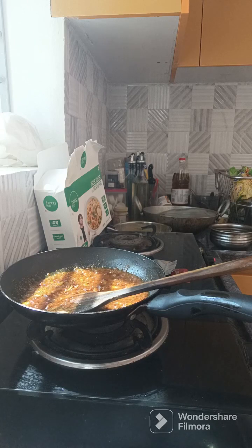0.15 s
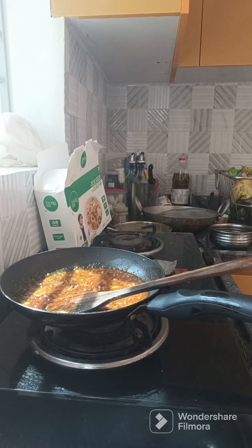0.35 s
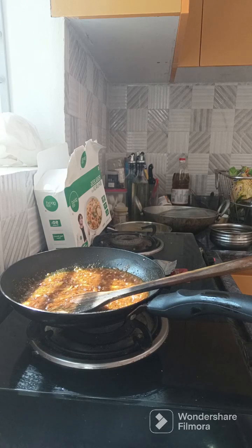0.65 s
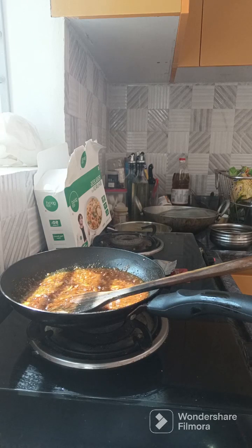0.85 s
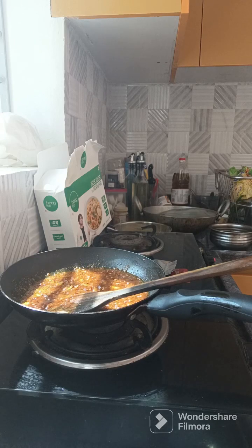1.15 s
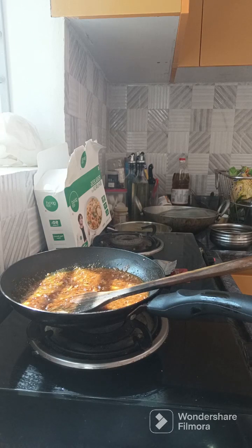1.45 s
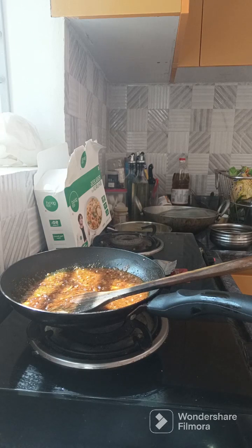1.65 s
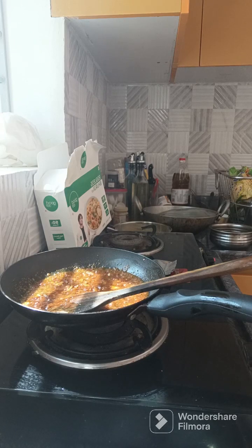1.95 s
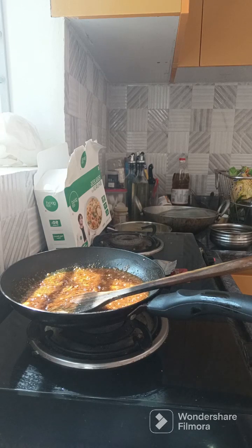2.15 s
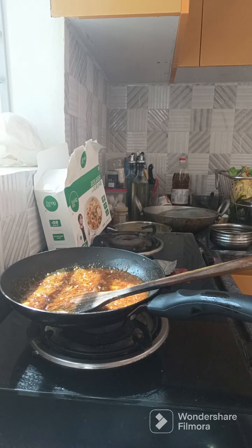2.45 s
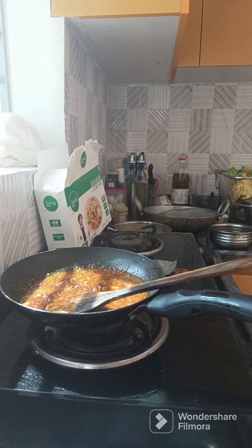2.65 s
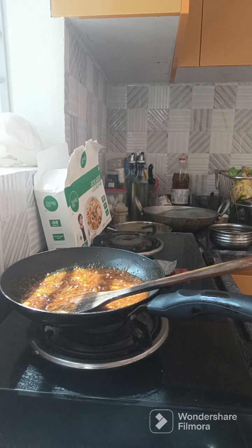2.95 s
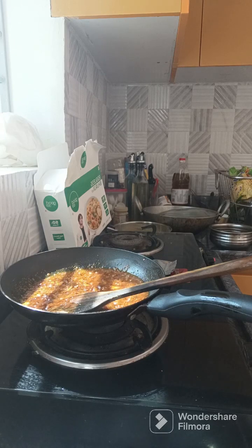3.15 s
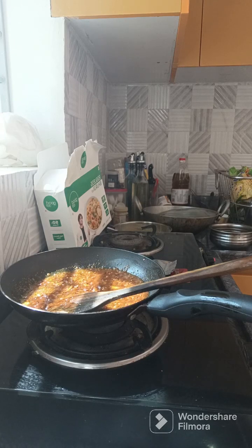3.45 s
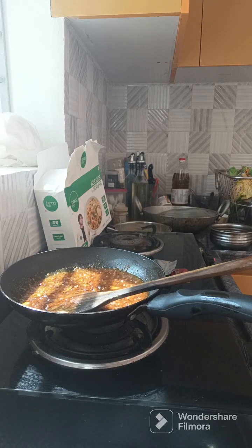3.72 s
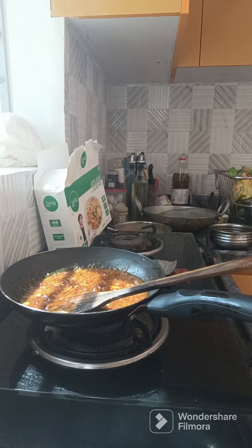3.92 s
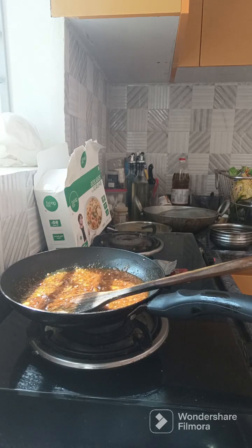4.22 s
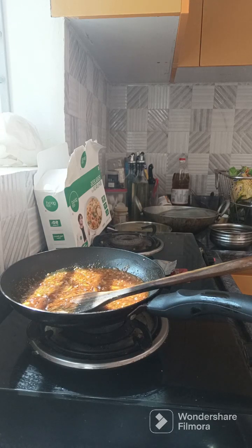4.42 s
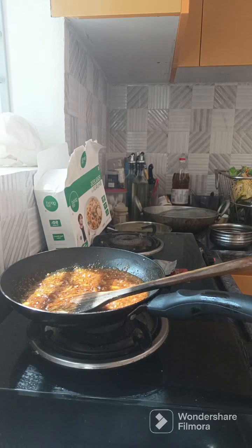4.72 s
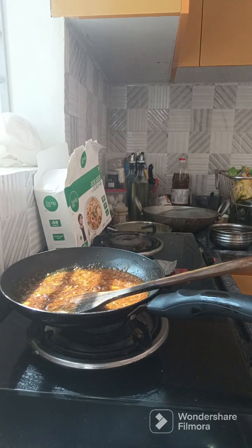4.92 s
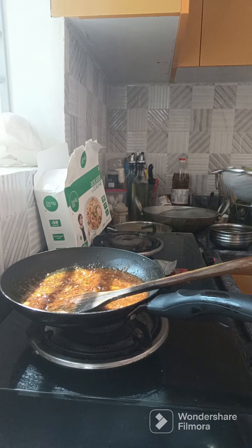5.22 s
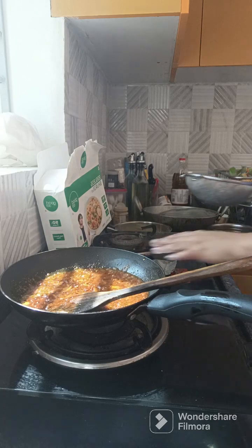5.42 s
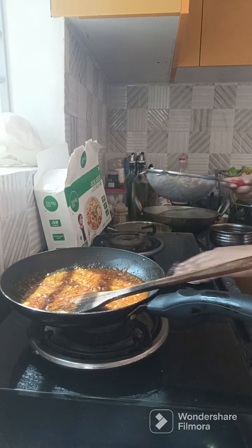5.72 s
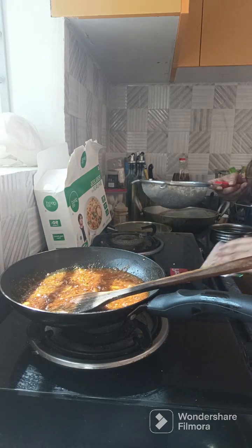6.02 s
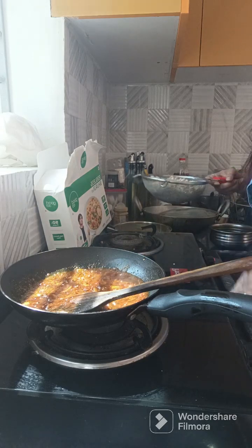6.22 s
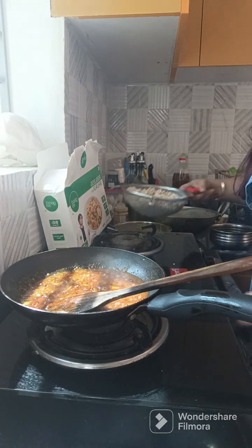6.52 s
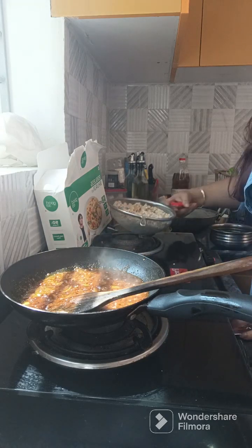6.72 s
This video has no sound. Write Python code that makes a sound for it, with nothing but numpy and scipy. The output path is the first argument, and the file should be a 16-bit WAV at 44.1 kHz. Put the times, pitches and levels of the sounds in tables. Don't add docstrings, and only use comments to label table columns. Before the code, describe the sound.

Onions and liquid simmer throughout in a frying pan close to a phone's stereo microphone: dense, grainy bubbling centred in the upper mids, frequent short rising pops, and an airy steam hiss that thins slightly. The background drone is barely present, and the small tiled kitchen gives short reflections. A very soft touch hums at 0.3 s. At 1.1 s a pot lands with a dull thud and metallic ring, rocking again at 1.3 s. From 1.9 to 2.9 s seven light, bright sieve taps come about every sixth of a second, the sixth hardest. At 3.4 s a faint high graze precedes a louder metal clash and quick mesh rattle at 3.6 s, ringing briefly. At 5.35 s a spoon cracks drily against the rim; fat spits vigorously until about 6.4 s, with the sharpest snap near 5.8 s. From 6.5 s soft, low bumps and knocks sound on the counter while simmering continues.

```python
import sys
import numpy as np
from scipy import signal
from scipy.fft import rfft, irfft, next_fast_len
from scipy.io import wavfile
from scipy.ndimage import uniform_filter1d, map_coordinates

SR = 44100
rng = np.random.default_rng(int(sys.argv[2]) if len(sys.argv) > 2 else 0)


def gain_from_db(level_db):
    decades = np.asarray(level_db, float) / 20
    return 10 ** decades


def dump_mix(stems):
    frames = np.atleast_2d(stems).T
    limited = np.clip(frames, -1, 1)
    pcm = np.round(limited * 32767).astype(np.int16)
    wavfile.write(sys.argv[1], SR, pcm)


N = 302967


def unit(x):
    return x / np.sqrt(np.mean(x ** 2) + 1e-20)


def along(points, hz):
    f, v = np.transpose(points)
    return np.interp(np.log(hz + 1), np.log(f + 1), v)


def wobble(rate):
    knots = rng.standard_normal(int(N * rate / SR) + 4)
    return map_coordinates(knots, [np.arange(N) * rate / SR])


def filtered(x, response):
    n = x.shape[-1]
    m = 2 * next_fast_len(n // 2 + SR // 10, True)
    return irfft(rfft(x, m) * response(np.fft.rfftfreq(m, 1 / SR)), m)[..., :n]


def colour(spectrum):
    def response(hz):
        gain = gain_from_db(along(spectrum, hz))
        cepstrum = irfft(np.log(gain / np.sqrt(np.mean(gain ** 2)) + 1e-6))
        cepstrum[1:len(hz) - 1] *= 2
        cepstrum[len(hz):] = 0
        return np.exp(rfft(cepstrum))
    return response


def patchy(depth_db, channels=2):
    z = signal.stft(rng.standard_normal((channels, N)), nperseg=256)[2]
    field = uniform_filter1d(rng.standard_normal(z.shape[1:]), size=2, axis=0)
    field = uniform_filter1d(field, size=7, axis=1)
    return unit(signal.istft(z * gain_from_db(depth_db * unit(field)), nperseg=256)[1][:, :N])


def leaned(x, points):
    return filtered(x, lambda hz: gain_from_db(.5 * np.outer([1, -1], along(points, hz))))


# f/Hz, lead/rad
PORT_LEAD = [(0, 2), (600, 1.5), (1030, 3), (1380, 1.16), (1640, 1), (2410, 1), (3190, 0.78), (3530, 1.02),
             (4910, 1), (5430, -6), (7240, -4.5), (8870, -1), (10500, -2.5), (16500, -10.5)]
# f/Hz, level/dB
PORT_LEAN = [(60, -8), (110, 1), (200, -6), (380, 14.5), (700, -1), (1290, 0), (2380, 1), (4400, -1.5),
             (8120, -4), (15000, 17.5)]


def ports(near, far, far_share):
    share = np.clip(far_share, 0, 1)
    lead = lambda hz: np.exp(.5j * np.outer([1, -1], along(PORT_LEAD, hz)))
    both = np.sqrt(1 - share) * filtered(near, lead) + np.sqrt(share) * far
    return leaned(both, PORT_LEAN)


def tiles(x, t60):
    t = np.arange(SR // 5) / SR
    echo = rng.standard_normal((2, len(t))) * gain_from_db(-60 * t / t60) * (t > .004)
    return signal.fftconvolve(x[None], echo / np.linalg.norm(echo[0]), axes=1)[:, :N]


def strikes(rows, spectrum, crack_s, tail_db, tail_s, gain_db, modes=(), ring_db=0, rise_s=0.00067,
            rough=.1, dull_hz=9000, size=SR // 2):
    first, last = (round(s * SR) - 10 for s in (rows[0][0], rows[-1][0]))
    out = np.zeros((2, N + SR))
    cracks, tails, ring = np.zeros((3, 2, last - first + size))
    t = np.arange(size) / SR
    for s, db, pan_db in rows:
        side = gain_from_db(db + gain_db + np.array([[pan_db], [-pan_db]]) / 2) * (1 - np.exp(-t / rise_s))
        start = round(s * SR) - 10 - first
        at = slice(start, start + size)
        cracks[:, at] += side * gain_from_db(-60 * t / crack_s) * rng.standard_normal((2, size))
        tails[:, at] += side * gain_from_db(tail_db - 60 * t / tail_s) * rng.standard_normal((2, size))
        for hz, level_db, t60 in modes:
            phase = 7 * rng.random() + np.array([[.7], [-.7]])
            blur = rough * np.cumsum(rng.standard_normal((2, size)), 1)
            decay = gain_from_db(ring_db + level_db + rng.normal(0, 1) - 60 * t / t60)
            ring[:, at] += side * decay * np.sin(2 * np.pi * hz * t + phase + blur)
    noise = cracks + filtered(tails, lambda hz: 1 / (1 + 1j * hz / dull_hz))
    out[:, first:last + size] = filtered(noise, colour(spectrum)) + ring
    return out[:, :N]


# f/Hz, level/dB per Hz
DRONE_SPECTRUM = [(12, -21), (20, -12.5), (169, -20.5), (228, -16.5), (320, -24), (403, -18), (898, -21),
                  (1240, -15.5), (1400, -11), (1820, -31.5), (3080, -120)]


def drone():
    a, b = patchy(4) * gain_from_db(1.5 * wobble(7))
    return gain_from_db(-70.5) * filtered(np.array([a + 0.61 * b, a - 0.36 * b]), colour(DRONE_SPECTRUM))


# f/Hz, level/dB
CUPBOARD_MODES = [(113, -4), (163, -38), (220, -6), (253, -3), (366, -7.5), (590, -4), (755, -3), (915, -6),
                  (1025, -9)]
# t/s, peak level/dB, favoured f/Hz, duration/s
KNOCKS_ON_COUNTER = [
    (1.136, -36, 180, 0.11),
    (1.268, -36.5, 277, 0.088),
    (3.588, -49, 220, 0.1),
    (6.585, -50, 188, 0.03),
    (6.763, -44, 570, 0.078),
    (6.811, -42, 800, 0.011),
    (6.85, -47, 540, 0.045),
]
# t/s, peak level/dB, f/Hz, duration/s
LIGHT_TOUCHES = [(0.263, -47.5, 244, 0.077), (.264, -56, 622, 0.048), (0.267, -63, 885, .03),
                 (.28, -54, 369, 0.036), (0.304, -51, 197, 0.036), (.305, -56, 600, .045),
                 (.34, -59, 353, 0.028), (.36, -63.5, 80, 0.054), (.37, -67, 260, .025),
                 (3.565, -51, 995, 0.046), (3.57, -54, 700, .03), (3.6, -49.5, 790, .05),
                 (3.605, -43, 1031, 0.072), (3.69, -52, 273, 0.046), (3.73, -61, 370, 0.02),
                 (6.56, -65, 720, 0.036), (6.7, -48.5, 644, 0.05), (6.7, -50, 896, 0.09),
                 (6.71, -54, 1017, 0.06), (6.75, -42.5, 926, 0.046), (6.77, -44.5, 369, 0.053),
                 (6.765, -48, 630, 0.035), (6.77, -45, 800, 0.035), (6.797, -40, 918, 0.031),
                 (6.8, -45, 588, 0.025), (6.835, -52, 713, .04), (1.391, -48.5, 230, 0.061),
                 (2.31, -65, 72, 0.069), (3.421, -58, 112, 0.07), (3.601, -50, 109.3, 0.089),
                 (4.245, -70, 90, 0.078), (4.831, -63.5, 235, 0.053), (5.341, -55, 763, 0.044),
                 (5.345, -55.5, 413, 0.021), (5.368, -55, 418, 0.017), (5.376, -58, 75, 0.056),
                 (5.457, -73, 79.5, .095), (6.535, -61, 227, .05), (6.575, -49.5, 243.5, 0.051),
                 (6.59, -61, 401, .03), (6.575, -58, 825, 0.052), (6.63, -53, 234, 0.033),
                 (6.672, -50.5, 235, .03), (6.705, -50, 256, .045), (6.852, -48, 450, .02),
                 (3.71, -60, 602, 0.073), (6.683, -58, 80, 0.041), (6.8, -57, 110, .07)]


def bumps():
    out = np.zeros((2, N + SR))
    reach_db, sag_per_s = 2.5, 0.1
    struck = [(s, db + own_db - reach_db * np.log2(hz / favoured) ** 2, hz, length)
              for s, db, favoured, length in KNOCKS_ON_COUNTER for hz, own_db in CUPBOARD_MODES]
    for s, db, hz, length in [*struck, *LIGHT_TOUCHES]:
        walk = np.cumsum(rng.standard_normal((2, SR // 4)), 1)[:, :round(1.6 * length * SR)]
        t = np.arange(walk.shape[1]) / SR
        rise = 1 - np.exp(-t / (0.094 * length))
        hold = rise * gain_from_db(-5 * t / length) / (1 + (t / length) ** 8)
        low_hz = min(hz, 600)
        drift = 0.035 * np.sqrt(low_hz / 250) * walk - np.pi * sag_per_s * low_hz * t ** 2
        apart = rng.choice([-.75, .75]) * hz / 900 * np.array([[1], [-1]])
        neighbour_hz = hz * rng.uniform(.95, 0.99)
        pair = np.sin(2 * np.pi * hz * t + drift[0] + apart)
        pair = pair + 0.44 * np.sin(2 * np.pi * neighbour_hz * t + drift[1] - apart)
        out[:, round(s * SR):][:, :len(t)] += gain_from_db(db + np.array([[.8], [-.8]])) * hold * pair
    return out[:, :N]


# t/s, peak level/dB, left-right level/dB
POT_LANDINGS = [
    (1.133, -18, 0),
    (1.269, -26.5, 0),
]
# f/Hz, level/dB per Hz
POT_THUD = [(29, -59), (50, -70), (112, 5), (150, -24), (260, -7.5), (510, -12.5), (831, -3), (920, 4),
            (1250, -20), (1500, 0), (1660, -18), (2400, 2.5), (2760, -21), (3050, 6), (3350, -17),
            (3670, -5), (4200, -12), (6500, -36), (8450, -75), (14300, -120)]
# f/Hz, level/dB, T60/s
POT_MODES = [(899, -5, .8), (946, -10, .4), (970, -4, .2), (1012, -7, .3), (1520, -7, 1.2), (2200, -7, .15),
             (2040, -17, .4), (2318, -12, .45), (2402, -8, .45), (2448, -9, .45), (2617, -4, .35),
             (3022, -5, .3), (3087, -6, .2), (3695, -7, .4)]


def pot_set_down():
    return strikes(POT_LANDINGS, POT_THUD, crack_s=0.038, tail_db=-5.0, tail_s=1.0, gain_db=-4.0,
                   modes=POT_MODES, ring_db=-5.0, rise_s=0.00046, rough=0.015, dull_hz=1520)


# t/s, peak level/dB, left-right level/dB
SIEVE_TAPS = [
    (1.9075, -22, 0.5),
    (2.077, -28, 0),
    (2.2436, -26.5, 0),
    (2.4078, -25.5, 0),
    (2.578, -23.5, 1),
    (2.7384, -21, 2),
    (2.8886, -25.5, 2),
]
# f/Hz, level/dB per Hz
TAP_SPECTRUM = [(2650, -39), (4500, -9.5), (6340, 5), (8980, -13), (9740, -5), (12300, -14.5), (15200, -14),
                (16100, -18), (16500, -49)]


def sieve_taps():
    taps = strikes(SIEVE_TAPS, TAP_SPECTRUM, crack_s=0.032, tail_db=-8.5, tail_s=0.4, gain_db=-3.5,
                   rise_s=0.0012, size=SR // 4)
    slides = [(s - .009, db - 8, pan_db) for s, db, pan_db in SIEVE_TAPS]
    return taps + strikes(slides, TAP_SPECTRUM, crack_s=0.12, tail_db=-20, tail_s=.2, gain_db=-4,
                          rise_s=.005, size=SR // 8)


# t/s, peak level/dB, left-right level/dB
GRAZE_CONTACT = [
    (3.3968, -31, 6),
]
# f/Hz, level/dB per Hz
GRAZE_SPECTRUM = [(4120, -29), (7000, -21), (7450, -15), (8150, -7), (8550, -4), (8850, -14), (9400, -7),
                  (10600, -6), (12300, -15), (14300, -6), (16000, -18)]
# f/Hz, level/dB, T60/s
HANDLE_MODES = [(8060, -1, .6), (8360, -2, .5), (9200, -6, .4), (9980, -4, .4), (10400, 0, .5),
                (10700, -5, .4), (11000, -2, .5), (11600, -3, .45), (12500, -6, .3), (14100, -7, .25)]


def sieve_graze():
    return strikes(GRAZE_CONTACT, GRAZE_SPECTRUM, crack_s=0.098, tail_db=-9.0, tail_s=0.5, gain_db=-8.5,
                   modes=HANDLE_MODES, ring_db=-8.0, rise_s=0.005, rough=0.07, dull_hz=8000)


# t/s, peak level/dB, left-right level/dB
SIEVE_CLASHES = [
    (3.5645, -17, -3),
    (3.5724, -24, -0.5),
]
# f/Hz, level/dB per Hz
CLASH_SPECTRUM = [(350, -39), (600, -22), (1020, -9), (1190, -19), (1730, -6), (2320, -17), (4000, -3.5),
                  (5520, 7), (6020, -12), (6340, -1.5), (8870, -4.5), (9920, -4), (15300, -13),
                  (16200, -29), (16800, -100)]
# f/Hz, level/dB, T60/s
RIM_MODES = [(4770, -1, .35), (5600, -1, .6), (6330, -5, .55), (8300, -10, .37), (9744, -9, .5)]
# t/s, peak level/dB, left-right level/dB
MESH_RATTLE = [
    (3.566, -24, 2),
    (3.5725, -22, 3),
    (3.5825, -25, 0),
    (3.5975, -24.5, 0),
    (3.6015, -24, 4),
    (3.6085, -25, 0),
    (3.6118, -26, 0),
    (3.678, -35, 0),
]
# f/Hz, level/dB per Hz
MESH_CHATTER = [(3000, -40), (5000, -16), (8000, -11), (10500, 0), (13500, -2), (16200, -20), (16800, -60)]
# f/Hz, level/dB, T60/s
MESH_STRANDS = [(9012, -8, .2), (9520, -2, .3), (9744, -3, .35), (10220, 0, .25), (11030, 0, .18),
                (11840, -4, .2), (13400, -5, .15), (14130, -8, .2)]
# f/Hz, level/dB
CLASH_LEAN = [(60, -1.0), (150, 1.0), (380, 6), (950, 1), (2380, 5), (5980, -0.5), (15000, 10)]


def sieve_clash():
    rim = strikes(SIEVE_CLASHES, CLASH_SPECTRUM, crack_s=0.57, tail_db=1, tail_s=0.61, gain_db=-12.0,
                  modes=RIM_MODES, ring_db=-0.5, rise_s=0.00039, rough=0.051, dull_hz=6000)
    mesh = strikes(MESH_RATTLE, MESH_CHATTER, crack_s=.018, tail_db=-8, tail_s=.12, gain_db=-7,
                   modes=MESH_STRANDS, ring_db=-8.5, rise_s=.0003, rough=0.056, size=SR // 6)
    return leaned(rim + mesh, CLASH_LEAN)


# opening t/s, level/dB, drift/(dB/s), hold/s
GATE_OPENINGS = [
    (1.13, 2, 28, 0.11),
    (1.268, 1.5, -42, 0.07),
    (1.345, -4.5, -1, .13),
    (3.56, 0.5, 29, 0.14),
]


def gate():
    opens, db, drift, stays = np.transpose(GATE_OPENINGS)[:, :, None]
    u = np.arange(N) / SR - opens
    held_db = db + drift * np.clip(u, 0, stays)
    held_db = held_db + 1500 * np.minimum(u, 0) - 498 * np.maximum(u - stays, 0)
    return gain_from_db(np.maximum(held_db.max(0), -28))


def utensils():
    clash = sieve_clash()
    bright = filtered(clash, lambda hz: hz ** 4 / (hz ** 4 + 1500 ** 4))
    left, right = (clash - bright + pot_set_down()) * gate() + bright
    side = filtered((left - right) / 2, lambda hz: hz ** 2 / (hz ** 2 + 350 ** 2))
    return sieve_taps() + sieve_graze() + (left + right) / 2 + np.array([side, -side])


# t/s, peak level/dB, left-right level/dB
SPOON_NUDGES = [
    (5.3489, -16.5, 0),
    (5.3541, -32, -2),
    (5.3702, -40, 14),
]
# f/Hz, level/dB per Hz
NUDGE_SPECTRUM = [(710, -75), (1330, -6.5), (2850, 1.5), (5450, 0.5), (8930, -12.5), (10400, -3.5),
                  (14300, -13), (16000, -28), (16500, -46)]


def spoon():
    return strikes(SPOON_NUDGES, NUDGE_SPECTRUM, crack_s=0.042, tail_db=-9.5, tail_s=0.36, gain_db=-5.0,
                   rise_s=0.0017, size=SR // 4)


# t/s, peak level/dB, left-right level/dB
FAT_SPITS = [(0.355, -38, 2), (0.5641, -38, 1), (1.005, -44, -5), (1.785, -39, -2), (2.3765, -42, -3),
             (2.6863, -41, -0.5), (3.003, -44, 6), (3.1467, -33, 2), (4.184, -49, 3), (4.6846, -46, -7),
             (5.2705, -37, 2), (5.449, -30, 7), (5.5774, -36, 7), (5.6194, -27.5, 4), (5.6448, -33, 0),
             (5.7235, -34, 7), (5.7367, -28, 1), (5.7666, -22.5, 2), (5.772, -36, 6), (5.8198, -28.5, 3),
             (5.907, -37, 2), (6.076, -38, 0.0), (6.1115, -36, 2), (6.2022, -36, 3), (6.3786, -30, 8),
             (6.544, -41, 1.0)]
# f/Hz, level/dB per Hz
SPIT_SPECTRUM = [(710, -61), (1200, -33), (1670, -10), (2660, -14), (4570, -8), (5460, -3.5), (7860, -16.5),
                 (11200, -11), (15300, -20), (16800, -31)]
# t/s, peak level/dB, left-right level/dB
FAT_FIZZLES = [
    (2.215, -37, 3),
    (3.4035, -36, 4),
    (5.3565, -31, 5),
    (5.4585, -32, 6),
    (5.7328, -38, 5),
    (5.7745, -31, 7),
]
# t/s, peak level/dB, left-right level/dB
FAT_SNAPS = [
    (5.6192, -27, 6),
    (5.7665, -19, 7),
    (5.7682, -27, 6),
]
# f/Hz, level/dB per Hz
SNAP_SPECTRUM = [(2500, -27), (6000, -17), (10000, 1), (16000, 1), (17000, -12)]


def spits():
    fat = strikes(FAT_SPITS, SPIT_SPECTRUM, crack_s=0.01, tail_db=-8, tail_s=0.17, gain_db=0.0,
                  rise_s=.0001, size=SR // 8)
    fizz = strikes(FAT_FIZZLES, MESH_CHATTER, crack_s=0.025, tail_db=-12, tail_s=.12, gain_db=-2.5,
                   rise_s=.0004, size=SR // 8)
    snap = strikes(FAT_SNAPS, SNAP_SPECTRUM, crack_s=.004, tail_db=-22, tail_s=.05, gain_db=0,
                   rise_s=.0001, size=SR // 20)
    return fat + fizz + snap


# t/s, peak level/dB, f/Hz
LARGE_BUBBLES = [(0.6255, -43, 2060), (0.7437, -27, 3500), (1.1384, -24, 2380), (1.4925, -37, 3560),
                 (1.5399, -26, 3480), (1.6724, -24, 3420), (1.8687, -28, 3230), (1.9644, -28, 3500),
                 (2.136, -27.5, 3370), (2.2952, -31, 3400), (2.4828, -29.5, 3430), (2.5047, -26, 3380),
                 (3.1454, -28.5, 3330), (3.321, -23, 3250), (3.8087, -25.5, 3550), (3.8257, -26, 3530),
                 (4.112, -27, 3400), (4.4236, -25.5, 3380), (4.6823, -23.5, 3470), (4.8489, -27.5, 2120),
                 (5.002, -30, 3190), (5.3481, -26, 3460), (5.5702, -25, 3320), (5.8182, -26, 3370),
                 (5.8376, -23.5, 3200), (6.1, -24, 3520), (6.1523, -26, 3200), (6.195, -27, 3100),
                 (6.379, -27.5, 2300), (6.4812, -29, 2030), (.1426, -30, 3140), (.5606, -38, 2130),
                 (1.6352, -33, 2050), (1.9929, -27, 3380), (3.0684, -33, 3290), (3.3074, -33, 3310),
                 (3.5029, -42, 3410), (3.717, -43, 3540), (3.9629, -37, 3540), (3.9823, -31, 3080),
                 (4.3555, -30, 3470), (4.4902, -34, 3320), (4.6648, -37, 3410), (4.8928, -31.5, 3400),
                 (5.0469, -33, 3330), (5.5513, -37, 3100), (6.2711, -32, 3310), (6.3041, -30, 3300),
                 (6.8274, -31, 3490), (3.399, -31, 2800), (3.408, -29.5, 2870), (3.094, -31, 3320),
                 (3.111, -31, 2680), (3.2, -32, 2500),
                 (0.0756, -33, 3400), (0.2398, -27, 3490), (0.5385, -31, 3280), (0.7022, -38, 3300),
                    (2.158, -30, 3430), (2.541, -28, 3370), (3.2175, -32, 3200), (3.7907, -36, 3400),
                    (4.1214, -31, 3320), (4.5525, -30, 3690), (4.7379, -32, 3480), (5.1007, -38, 3280),
                    (5.3332, -42, 3360), (5.8959, -31, 3300), (6.6931, -32, 3130)]
# t/s, peak level/dB, f/Hz
SMALLER_BUBBLES = [(1.3149, -27, 5230), (1.785, -35, 5470), (2.3765, -25.5, 5340), (3.489, -32, 5100),
                   (3.5523, -30, 5460), (4.1846, -29, 4750), (4.4308, -34, 5850)]


def pops():
    out, t = np.zeros(N + SR), np.arange(SR // 100) / SR
    half_s = 0.00087
    swell = np.exp(-((t - 1.74 * half_s) / half_s) ** 2)
    for s, db, hz in [*LARGE_BUBBLES, *SMALLER_BUBBLES]:
        packet = swell * np.sin(2 * np.pi * hz * t * (0.941 + 25 * t))
        out[round(s * SR) - 20:][:len(t)] += gain_from_db(db - 2.5) * packet
    return ports(out[:N], tiles(out[:N], .09), far_share=.2)


def bursts(count, size_db, life_s):
    when, size = rng.random((count, 2)).T
    power = gain_from_db(np.minimum(-size_db * np.log(1 - size), 12.5)) ** 2
    train = np.bincount((when * N).astype(int), power, N)
    t = np.arange(SR // 50) / SR
    puff = t / life_s * np.exp(-t / life_s)
    return np.sqrt(np.abs(signal.fftconvolve(train, puff)[:N]))


def bubbles(count, centre_hz, spread, cycles, size_db):
    draw, t = rng.random((count, 3)), np.arange(SR // 120) / SR
    hz = np.clip(centre_hz * np.exp(spread * (2 * draw[:, 1:2] - 1)), 500, 9000)
    size = gain_from_db(np.minimum(-size_db * np.log(1 - draw[:, 2:]), 10.5)) * np.sqrt(hz / centre_hz)
    u = t * hz / cycles
    ring = size * u * np.exp(-2 * u) * np.sin(2 * np.pi * hz * t * (1 + 0.037 * u))
    at = (draw[:, :1] * N).astype(int) + np.arange(len(t))
    return unit(np.bincount(at.ravel(), ring.ravel(), N + SR)[:N])


# f/Hz, width/Hz, swing/dB
BOWL_RESONANCES = [(1650, 250, .6), (2150, 350, 1.2), (3420, 420, 1.4), (5400, 500, 1.8)]


def waxing(x):
    f, t, z = signal.stft(x, SR, nperseg=256)
    swell_db = 0
    for hz, width, swing_db in BOWL_RESONANCES:
        swing = swing_db * np.interp(t * 34, np.arange(400), rng.standard_normal(400))
        swell_db = swell_db + np.exp(-((f[:, None] - hz) / width) ** 2) * swing
    return signal.istft(z * gain_from_db(swell_db), SR, nperseg=256)[1][:, :N]


# t/s, level/dB
BOIL_LEVEL = [(0.0, -45.5), (0.55, -44), (1.03, -45.5), (1.36, -42.5), (1.64, -46), (2.51, -46),
              (2.64, -44.5), (3.62, -47), (3.73, -44.5), (4.59, -47), (4.95, -48.5), (5.7, -46), (6.1, -47),
              (6.33, -47), (6.54, -47), (6.87, -46)]
# f/Hz, level/dB per Hz
BOIL_SPECTRUM = [(530, -74), (900, -28.5), (1160, -21.5), (1250, -34), (1340, -8.5), (1450, -13),
                 (1690, -7.5), (1980, -3.5), (2560, -4), (2930, -7), (3470, 1.5), (4290, -10.5),
                 (5500, -3.5), (6170, -13.5), (7500, -16), (9750, -44), (16500, -120)]
# f/Hz, level/dB per Hz
STEAM_SPECTRUM = [(2240, -28), (3800, -11.5), (4240, 2), (4540, -4), (5430, -3), (6290, -10), (8980, -12),
                  (10200, -6.5), (12300, -11), (15500, -26.5), (16200, -23), (16500, -55)]


def simmer():
    t = np.arange(N) / SR
    boil_db = np.interp(t, *np.transpose(BOIL_LEVEL))
    hiss_db = -47.5 + 0.3 * (boil_db - boil_db.mean()) - 0.4 * t
    surge = wobble(6.6)
    boil_gate = unit(.5 + unit(bursts(count=3500, size_db=1.0, life_s=0.00062)))
    hiss_bursts = unit(bursts(count=5000, size_db=6.5, life_s=0.00055))
    hiss_gate = unit(1.0 + 0.45 * boil_gate + hiss_bursts)
    rings = bubbles(count=4500, centre_hz=2998, spread=0.856, cycles=7.03, size_db=2.5)
    near_boil = patchy(1.5, channels=1)[0] * boil_gate + .6 * rings
    far_boil = patchy(1.5) * np.sqrt(boil_gate) + .65 * tiles(rings, .16)
    boil = ports(near_boil, far_boil, far_share=.55)
    near_steam = patchy(1.7, channels=1)[0] * hiss_gate
    steam = ports(near_steam, patchy(1.7) * np.sqrt(hiss_gate), far_share=.7)
    boil_gain = gain_from_db(boil_db - 0.84 + 0.43 * surge + 1.23 * wobble(30))
    steam_gain = gain_from_db(hiss_db + 0.37 * surge + 1.27 * wobble(14))
    boil = boil_gain * filtered(boil, colour(BOIL_SPECTRUM))
    return waxing(boil + steam_gain * filtered(steam, colour(STEAM_SPECTRUM)))


def scene():
    return drone() + bumps() + utensils() + spoon() + spits() + pops() + simmer()


def top_cut(x):
    return signal.sosfilt(signal.butter(12, 17000, fs=SR, output="sos"), x)


# f/Hz, width/Hz, depth 0-1
PORT_DIPS = [(4230, 180, .95), (4650, 150, .3), (6110, 120, .45), (9050, 250, .45)]


def record(dry):
    dips = lambda f: np.prod([1 - np.clip(d, 0, .95) / (1 + ((f - c) / w) ** 2) for c, w, d in PORT_DIPS], 0)
    filled = np.clip(.14 + .5 * wobble(19), 0, .8)
    dipped = filled * dry + (1 - filled) * filtered(dry, dips)
    top_hz = 15870
    bass_cut = lambda f: (1j * f / 60) ** 2 / (1 + 1j * f / 60) ** 2
    heard = filtered(dipped, lambda f: bass_cut(f) * (f < top_hz + 1100))
    top = filtered(heard, lambda f: f >= top_hz)
    power = uniform_filter1d(top[0] ** 2, size=120)
    sharp = (power > gain_from_db(-54) ** 2) & (power > 5 * np.roll(power, 130))
    shut = 1 - uniform_filter1d(sharp * 1., size=64)
    return top_cut(heard - top * shut)


dry = scene()
out = record(dry)
dump_mix(out)
```